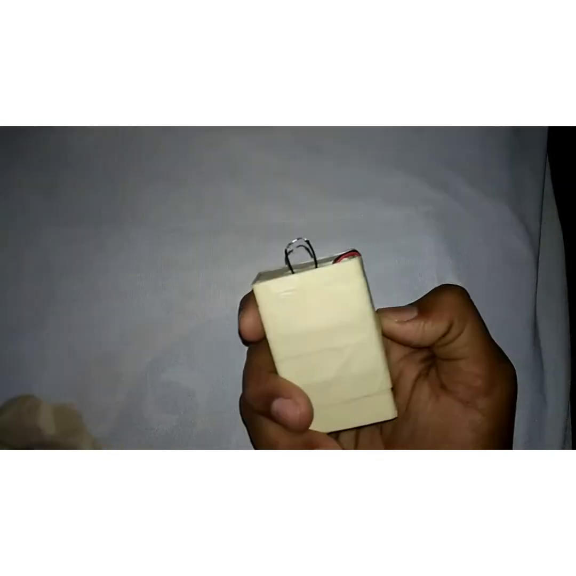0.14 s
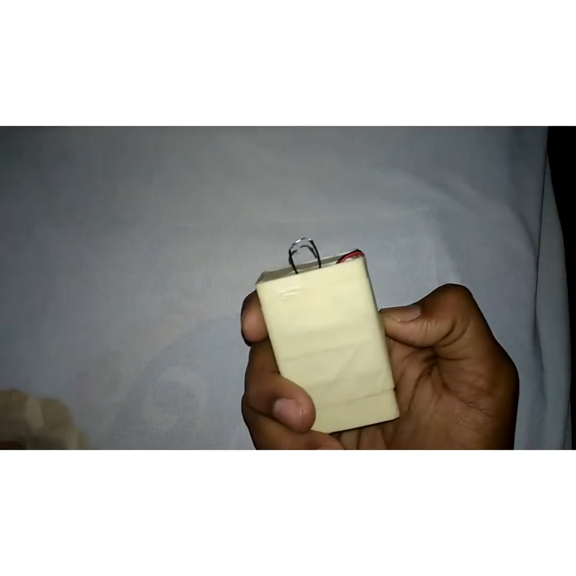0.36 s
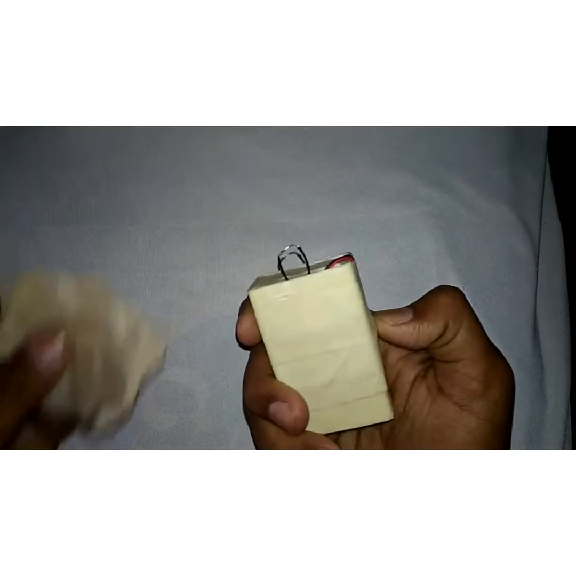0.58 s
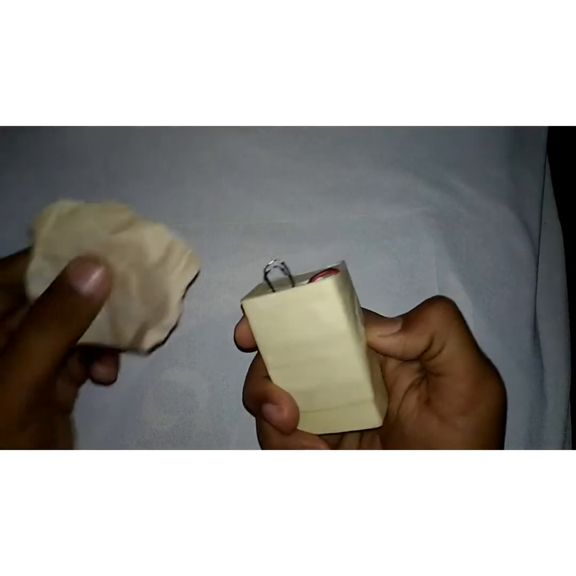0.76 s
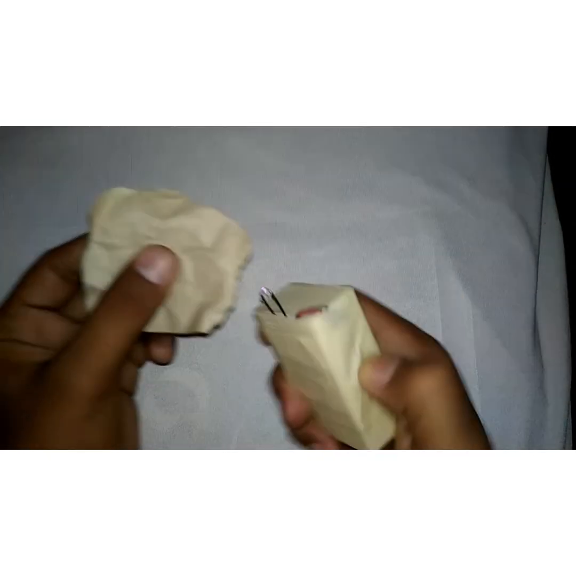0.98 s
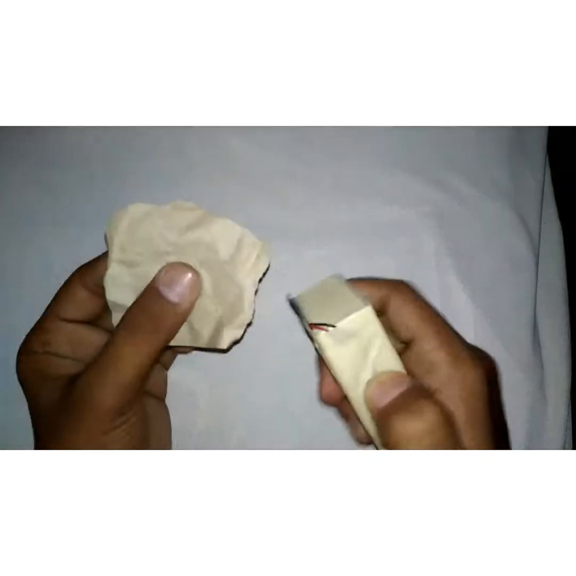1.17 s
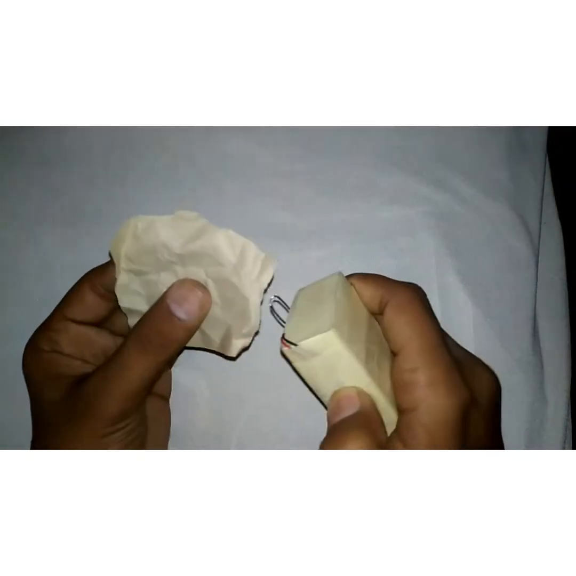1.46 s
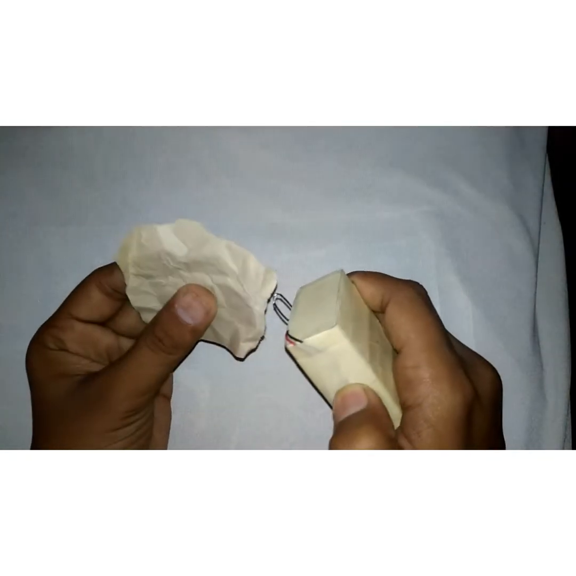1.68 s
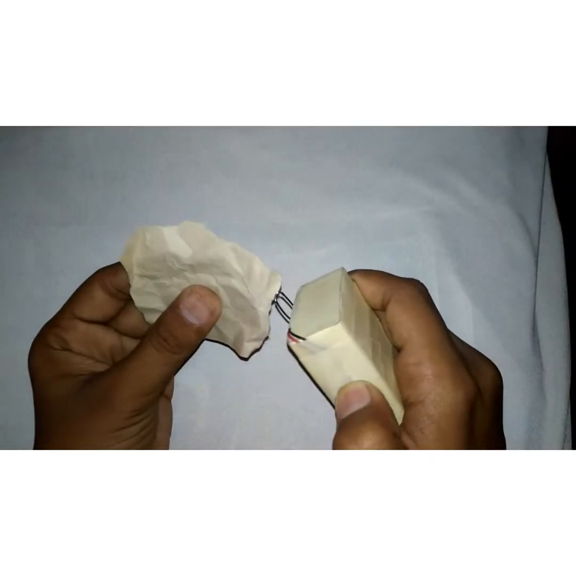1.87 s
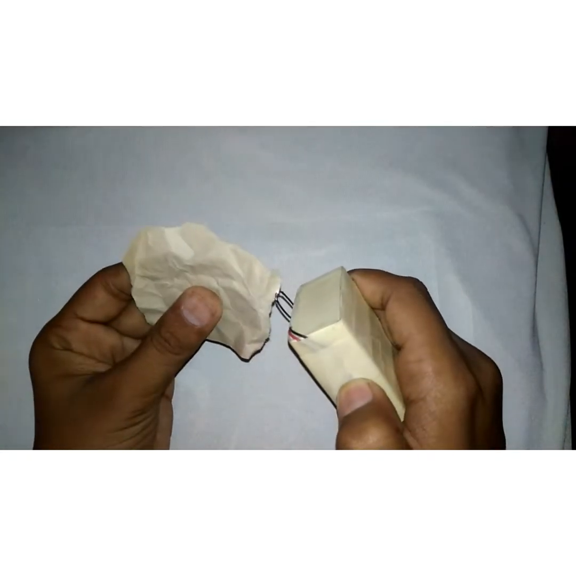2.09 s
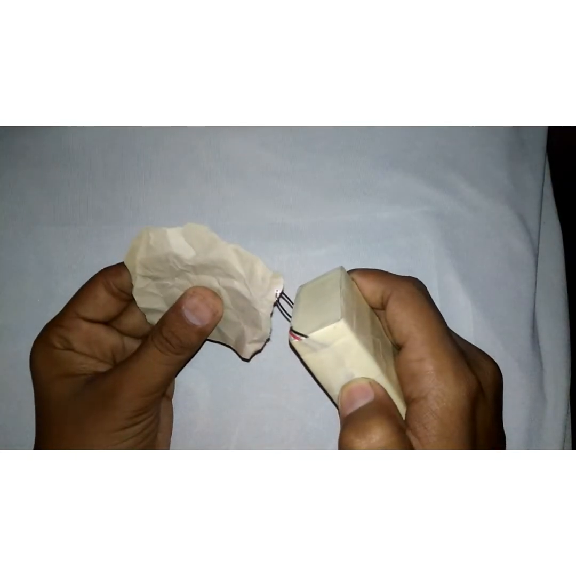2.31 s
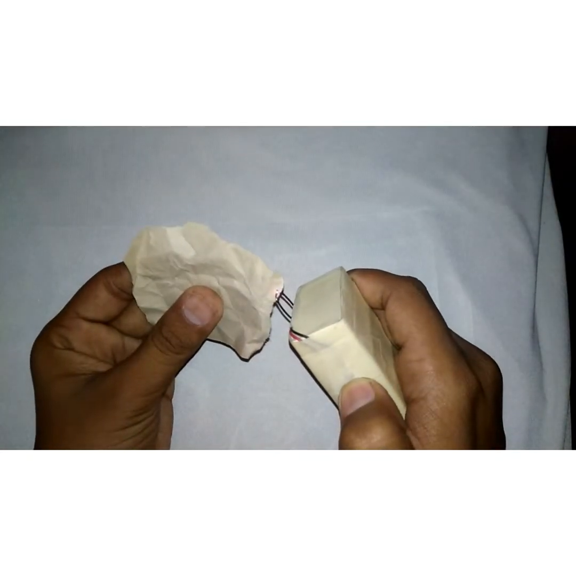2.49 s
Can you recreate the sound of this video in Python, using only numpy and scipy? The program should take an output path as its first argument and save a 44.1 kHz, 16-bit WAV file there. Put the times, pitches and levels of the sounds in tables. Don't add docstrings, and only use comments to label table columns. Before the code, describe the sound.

A small electric arc strikes almost at once and burns as a piercing, crackly high hiss with brief whistles and dropouts, then dies near the end; faint paper rustles and finger taps, quiet room, close stereo microphones.

```python
import sys
import numpy as np
from scipy import signal
from scipy.fft import rfft, irfft, next_fast_len
from scipy.io import wavfile
from scipy.ndimage import uniform_filter1d, map_coordinates

SR = 44100
rng = np.random.default_rng(int(sys.argv[2]) if len(sys.argv) > 2 else 0)


def materialize(psi):
    bounded = np.clip(np.atleast_2d(psi).T, -1, 1)
    quanta = np.round(bounded * 32767).astype(np.int16)
    wavfile.write(sys.argv[1], SR, quanta)


def invert_db(x):
    u = np.asarray(x, float) / 20
    return 10 ** u


N = 116865
T = np.arange(N) / SR


def unit(x):
    return x / np.sqrt(np.mean(x ** 2) + 1e-20)


def along(points, hz):
    f, v = np.transpose(points)
    return np.interp(np.log(hz + 1), np.log(f + 1), v)


def wobble(rate):
    return map_coordinates(rng.standard_normal(N // 100), [T * rate])


def filtered(x, response):
    m = next_fast_len(N + 8192)
    return irfft(rfft(x, m) * response(np.fft.rfftfreq(m, 1 / SR)), m)[..., :N]


def coloured(x, points):
    return unit(filtered(x, lambda hz: invert_db(along(points, hz))))


def resonance(x, hz, width_hz):
    return unit(filtered(x, lambda f: 1j * f * width_hz / (hz * hz - f * f + 1j * f * width_hz)))


def window(start, length, edge):
    return np.clip(np.minimum(T - start + edge / 2, start + length + edge / 2 - T) / edge, 0, 1)


def clicks(rate, scatter_db):
    chance, sign = rng.random((2, N)), rng.standard_normal((2, N))
    size = invert_db(scatter_db * rng.standard_normal((2, N)))
    return unit((chance < rate / SR) * sign * size)


def spread(pair, alike):
    turn = lambda hz: np.arccos(np.clip(along(alike, hz), -1, 1)) / 2
    mid, side = filtered(pair, lambda hz: np.array([np.cos(turn(hz)), np.sin(turn(hz))]))
    return np.array([mid + side, mid - side])


def panned(x, pan_db):
    return x * invert_db(np.array([[0.5], [-0.5]]) * pan_db)


def leaning(x, pan_points):
    return filtered(x, lambda hz: panned(1, along(pan_points, hz)))


def room():
    # frequency in Hz, level in dB per Hz.
    air_colour = [(13, -87), (22, -14), (113, -6), (251, -11.5), (1290, -16.5), (2150, -23), (3400, -21),
                  (4760, -23), (7000, -17.5), (9100, -65), (15400, -120)]
    # pitch in Hz, width in Hz, level in dB.
    hum_bands = [(106, 8, -79.5), (124.65, 2.3, -80), (208.3, 4.4, -83.5), (350, 40, -82.5)]
    # frequency in Hz, left-right likeness from 0 to 1.
    air_alike = [(25, 0), (60, 0.94), (130, 0.89), (290, 0.74), (640, 0), (1400, 0)]
    # frequency in Hz, left over right in dB.
    air_pan = [(25, -14), (60, 7), (200, 1.5), (380, 10), (2400, 14.5), (6000, -2.5)]
    air_db, swell_db, hum_waver_db = -73, 1, 2.5
    hush_db = -4 * window(0.07, 0.09, 0.13)
    air = coloured(rng.standard_normal((2, N)), air_colour)
    sound = air * invert_db(air_db + swell_db * wobble(6.99) + hush_db)
    for hz, width, db in hum_bands:
        hum = resonance(rng.standard_normal((2, N)), hz, width)
        sound = sound + invert_db(db + hum_waver_db * wobble(7.02)) * hum
    return leaning(spread(sound, air_alike), air_pan)


def paper():
    # start in seconds, length in seconds, centre in Hz, level in dB.
    rustles = [(0.235, 0.08, 3400, -58.5), (0.223, 0.057, 3950, -66), (0.29, 0.093, 5940, -62),
               (0.696, 0.058, 3070, -70.5), (0.3, 0.11, 1920, -72.5), (0.863, 0.094, 3500, -68),
               (1.097, 0.081, 4800, -65), (1.376, 0.062, 3470, -67), (1.426, 0.095, 3260, -72.5),
               (1.447, 0.066, 1400, -80), (1.558, 0.12, 3400, -72.5), (1.874, 0.091, 3000, -73),
               (1.939, 0.16, 6060, -63), (2.192, 0.15, 3570, -62), (2.22, 0.2, 6730, -55),
               (2.344, 0.095, 3650, -65), (2.426, 0.099, 4130, -62), (2.409, 0.091, 920, -73)]
    crinkles_per_s, relative_width, edge_s = 1300, 0.52, 0.045
    flutter_db, pan_db = 1.5, 5
    grains = clicks(crinkles_per_s, 2.3) + 4 * rng.standard_normal((2, N))
    strokes = np.zeros((2, N))
    for start, length, hz, db in rustles:
        width = relative_width * hz
        band = resonance(resonance(grains, hz, width), hz, width)
        strokes += invert_db(db) * window(start, length, edge_s) ** 2 * band
    return panned(strokes * invert_db(flutter_db * wobble(39.95)), pan_db)


def taps():
    # start in seconds, pitch in Hz, level in dB, time to fade by 60 dB in seconds.
    contacts = [(0.247, 1265, -55.5, 0.074), (0.284, 350, -56.5, 0.065), (.31, 608, -60, 0.11),
                (.8, 608, -66.5, 0.15), (.88, 1182, -65, 0.16), (0.998, 350, -69.5, 0.44),
                (1.1, 630, -63, 0.14), (1.18, 893, -70.5, 0.15), (1.605, 59, -55.5, 0.2),
                (2.165, 616, -60.5, 0.2), (2.439, 878, -60.5, 0.085), (1.37, 315, -64.5, 0.12),
                (1.13, 93, -65, 0.1), (1.555, 122, -61.5, 0.13), (1.93, 101.3, -55, .12),
                (2.61, 72, -66, 0.13)]
    rise_s, waver_radians, tap_pan_db, thump_pan_db = 0.0044, 1.3, 9, -12
    sound = np.zeros((2, N))
    for start, hz, db, t60 in contacts:
        age = np.clip(T - start, 0, None)
        is_tap = hz > 100
        waver = waver_radians * wobble(hz / 25) * is_tap
        tone = np.sin(2 * np.pi * hz * age + waver)
        swell = (1 - np.exp(-age / rise_s)) * invert_db(db - 60 * age / t60)
        sound += panned(swell * tone, tap_pan_db if is_tap else thump_pan_db)
    return sound


def corona():
    # start in seconds, length in seconds, level in dB, left over right in dB.
    sizzles = [
        (-.01, 0.073, -70.5, 14.5),
        (.0, 0.28, -81.5, 12),
        (0.167, 0.054, -63, 5),
    ]
    # frequency in Hz, level in dB.
    sizzle_colour = [(6000, -41), (7500, -9.5), (9200, 1.5), (10500, -2.5), (12000, -20), (12800, -18),
                     (15500, -32)]
    edges_s = (.03, .02, .004)
    crackle = rng.standard_normal((2, N)) + 0.26 * clicks(620, 4.1)
    sizzle = coloured(crackle, sizzle_colour)
    sound = np.zeros((2, N))
    for (start, length, db, pan), edge in zip(sizzles, edges_s):
        sound += invert_db(db) * window(start, length, edge) * panned(sizzle, pan)
    return sound


def spark_stream():
    sparks_per_s, scatter_db, smooth_share = 4000, 1, 0.75
    crackly = 0.23 * window(0.93, 0.82, 0.022)
    share = np.clip(smooth_share - crackly, 0, 1)
    sparks = np.sqrt(1 - share) * clicks(sparks_per_s, scatter_db)
    return sparks + np.sqrt(share) * rng.standard_normal((2, N))


def stutter(relight_db):
    # start in seconds, length in seconds, change in dB.
    dropouts = [(1.155, 0.012, -0.5), (1.229, 0.0068, -3), (1.258, 0.0078, -5), (1.288, 0.0047, 0),
                (1.327, 0.01, -6), (1.344, 0.0062, -6), (1.292, 0.028, -3), (1.388, 0.023, -9.5),
                (1.408, 0.008, -2.5), (1.475, 0.0061, 0), (1.761, 0.043, -6.5), (1.815, 0.029, -11),
                (1.839, 0.029, -7.5), (2.026, .012, 1), (2.22, 0.031, -8.5), (2.27, 0.015, -8.5),
                (2.302, 0.042, -7), (2.296, .006, -11), (2.367, 0.017, -5)]
    # changes per second, depth in dB.
    flicker = [(35, .4), (90, .9)]
    level_db = relight_db
    for start, length, depth in dropouts:
        level_db = level_db + depth * window(start, length, .007)
    for rate, depth in flicker:
        level_db = level_db + depth * wobble(rate)
    return level_db


def ringing(sparks, shade_db):
    # pitch in Hz, width in Hz, level in dB.
    rings = [(8035, 830, -5.5), (8640, 470, -6), (8970, 217, -5), (9750, 670, -0.5), (10200, 300, -2.5),
             (10850, 470, -3), (10870, 1100, -9.5)]
    # frequency in Hz, level in dB.
    skirt = [(5000, -41), (6500, -7), (7250, -8.5), (7550, -5.5), (11500, 0.5), (11800, -15), (13000, -42)]
    tilt_hz, tilt_span_hz, drift_db, drift_rate = 9870, 1390, 2, 18
    ring = np.zeros((2, N))
    for k, (hz, width, db) in enumerate(rings):
        lowness = np.clip((tilt_hz - hz) / tilt_span_hz, 0, 1)
        level_db = db + lowness * shade_db + drift_db * wobble(drift_rate)
        ring += (-1) ** k * invert_db(level_db) * resonance(sparks, hz, width)
    ring = coloured(ring, skirt)
    power = uniform_filter1d(np.mean(ring ** 2, axis=0), size=2600)
    return ring / np.sqrt(np.abs(power) + 1e-9)


def thin_hiss(sparks, stutter_db, top_db):
    # frequency in Hz, level in dB.
    hiss_colour = [(5000, -41.5), (6800, -14), (8000, -39), (11600, 2), (11950, -5.5), (12400, -1),
                   (13500, -3.5), (15500, -8)]
    # start in seconds, length in seconds, change in dB.
    top_gaps = [
        (2.145, .09, -7),
        (2.268, .05, -14),
    ]
    level_db = top_db + stutter_db
    for start, length, depth in top_gaps:
        level_db = level_db + depth * window(start, length, .02)
    return invert_db(level_db) * coloured(sparks, hiss_colour)


def snaps(ring):
    # time in seconds, peak in dB.
    strong_snaps = [(0.412, -23), (0.6579, -27), (0.7637, -26), (0.8064, -26), (0.9554, -25), (0.9844, -27),
                    (1.0146, -27), (1.064, -28), (1.08, -23), (1.0884, -25), (1.1024, -23), (1.1693, -32),
                    (1.1787, -29), (1.2114, -32), (1.2476, -35), (1.2644, -35), (1.3179, -36),
                    (1.3394, -35), (1.3718, -34), (1.4272, -32), (1.4714, -29), (1.4756, -24),
                    (1.4854, -26), (1.5044, -29), (1.5399, -31), (1.5648, -28), (1.6023, -27),
                    (1.7868, -35), (1.8278, -35), (1.8477, -31), (1.9006, -33), (2.0034, -25),
                    (2.1999, -40), (2.2508, -31), (2.2613, -27), (2.2867, -30), (2.3004, -36),
                    (2.3144, -36), (2.3361, -29), (2.3725, -28)]
    rise_s, t60_s, trim_db = .0012, .02, -7
    sound = np.zeros((2, N))
    for time, db in strong_snaps:
        span = slice(round((time - rise_s) * SR), round((time + t60_s) * SR))
        age = T[span] - T[span][0]
        snap = (1 - np.exp(-age / rise_s)) * invert_db(-60 * age / t60_s) * ring[:, span]
        sound[:, span] += invert_db(db + trim_db) * snap / np.abs(snap[0]).max()
    return sound


def whistles():
    # start in seconds, length in seconds, pitch in Hz, level in dB.
    locked_tones = [(0.222, 0.024, 9500, -49.5), (0.237, 0.055, 7630, -38), (0.324, 0.015, 10170, -36),
                    (0.385, 0.088, 9190, -37.5), (0.428, 0.019, 10200, -40), (0.466, 0.043, 9900, -43),
                    (0.601, 0.022, 10200, -41.5), (0.772, 0.02, 10270, -38), (0.946, 0.061, 7640, -47),
                    (1.022, 0.041, 7760, -47), (1.074, 0.023, 9300, -36), (1.101, 0.042, 10170, -38),
                    (1.183, 0.0099, 9900, -39), (1.47, 0.026, 9460, -39.5), (1.58, 0.046, 9640, -44),
                    (1.614, 0.037, 9180, -38.5), (1.649, 0.062, 8560, -46.5), (1.57, 0.052, 10280, -52),
                    (1.716, 0.029, 8720, -43.5), (1.852, 0.01, 10170, -40.5), (1.86, 0.0082, 9750, -38.5),
                    (1.957, 0.093, 9750, -48.5), (1.931, 0.17, 10620, -47.5), (0.664, 0.047, 7910, -48.5),
                    (0.875, 0.066, 7850, -45), (1.02, 0.016, 9860, -38), (2.24, 0.0053, 9400, -58),
                    (2.273, 0.0049, 9450, -49), (2.337, 0.027, 9200, -40), (2.369, 0.0071, 9350, -33.5),
                    (2.38, 0.022, 7580, -40)]
    width_hz, edge_s = 130, .004
    sound = np.zeros((2, N))
    for start, length, hz, db in locked_tones:
        narrow = resonance(rng.standard_normal((2, N)), hz, width_hz)
        tone = resonance(narrow, hz, 3 * width_hz)
        gate = window(start, length, edge_s)
        even = np.sqrt(gate.sum() / np.sum(gate * tone[0] ** 2))
        sound += invert_db(db) * gate * tone * even
    return sound


def arc():
    # time in seconds, strength in dB, thin top hiss in dB, left over right in dB,
    # low resonances in dB.
    strength = [(0.23, -44, 2.5, -4, 14), (0.249, -38, -13, -1.5, 7), (0.44, -35, -18, -4.5, -3.5),
                (0.75, -40, -5, -2.5, 4.5), (0.99, -41, -9.5, -5, 2), (1.111, -40, -6.5, 1, -4.5),
                (1.24, -48.5, -2, 1.5, -6.5), (1.37, -48.5, -3, -12, -12), (1.49, -44.5, -5, -3, 0),
                (1.53, -44.5, 0, -1.5, 4.5), (1.61, -39.5, -14, -3, -5), (1.781, -42, -6.5, -8, -6),
                (2.02, -38.5, -5, -3, 0), (2.22, -53.5, -4.5, -7.5, 1), (2.25, -40.5, -14, -3, 4),
                (2.391, -40.5, -7, -0.5, -2), (2.57, -69, -4, -3, 2.5), (2.65, -65.5, -5, -1, -5)]
    # time in seconds, level in dB.
    relight = [
        (1.866, 0),
        (1.874, -12),
        (1.89, -12),
        (1.925, -2),
        (1.96, 0),
    ]
    # frequency in Hz, left-right likeness from 0 to 1.
    arc_alike = [(6000, 0.46), (7700, 0.32), (10000, 0.81), (15000, 0.6)]
    # frequency in Hz, left over right in dB.
    arc_lean = [(6000, 1.5), (7600, -6), (8600, -3), (10500, 6), (15000, 1)]
    strike_s, strike_rise_s = 0.213, 0.026
    times, *columns = np.transpose(strength)
    db, top_db, pan_db, low_db = [np.interp(T, times, column) for column in columns]
    relight_db = np.interp(T, *np.transpose(relight))
    stutter_db = stutter(relight_db)
    sparks = spark_stream()
    ring = ringing(sparks, low_db + .5 * relight_db)
    hiss = thin_hiss(sparks, stutter_db, top_db)
    lit = np.clip((T - strike_s) / strike_rise_s, 0, 1) ** 2 * invert_db(db)
    sound = lit * (invert_db(stutter_db) * ring + hiss) + snaps(ring) + whistles()
    return panned(leaning(spread(sound, arc_alike), arc_lean), pan_db)


def holed(x):
    # frequency in Hz, share of the time it is silent from 0 to 1.
    silent_share = [(300, .06), (1400, .1), (2200, .38), (4900, .48), (7150, .42), (7500, .03),
                    (11500, .02), (11950, .5), (12500, .12), (15500, .18)]
    hole_db, patch_db = -40, 2.5
    hz, _, z = signal.stft(x, SR, nperseg=1024)

    def smooth(v, bins, frames):
        return unit(uniform_filter1d(uniform_filter1d(v, bins, axis=1), frames, axis=2))

    blocks = rng.standard_normal(z.shape)[:, np.arange(len(hz)) // 5][:, :, np.arange(z.shape[2]) // 2]
    field = smooth(blocks + blocks.sum(axis=0), 1, 4)
    patch = smooth(rng.standard_normal(z.shape), 7, 3)
    share = along(silent_share, hz)[:, None]
    empty = 1.7 * field > np.log(1 / share - 1)
    gain_db = hole_db * empty + patch_db * patch * np.sqrt(share)
    return signal.istft(z * invert_db(gain_db), SR, nperseg=1024)[1][:, :N]


def scene():
    return room() + paper() + taps() + corona() + arc()


def band_limit(x):
    return signal.sosfilt(signal.butter(12, 15970, fs=SR, output="sos"), x)


def record(dry):
    limited = filtered(dry, lambda hz: hz < 15830)
    return band_limit(holed(limited))


dry = scene()
out = record(dry)
materialize(out)
```